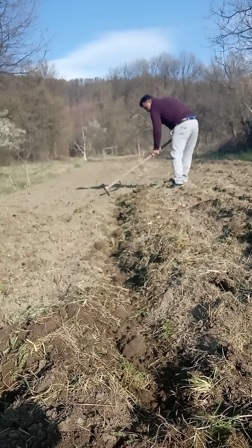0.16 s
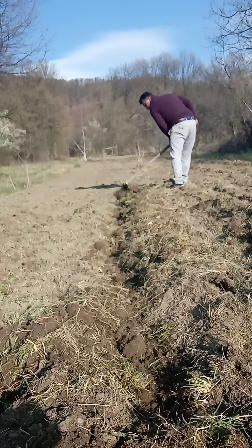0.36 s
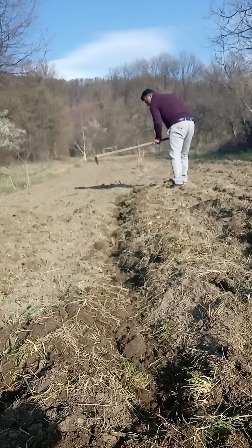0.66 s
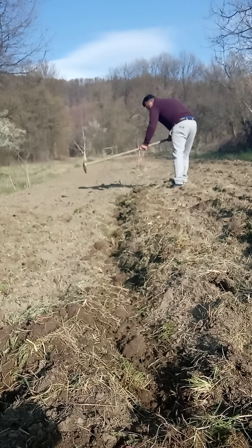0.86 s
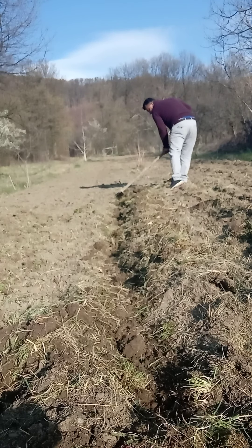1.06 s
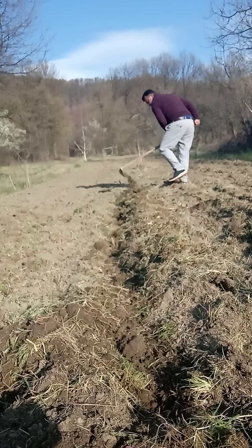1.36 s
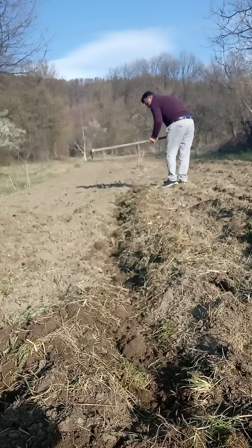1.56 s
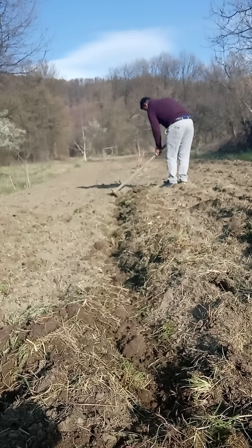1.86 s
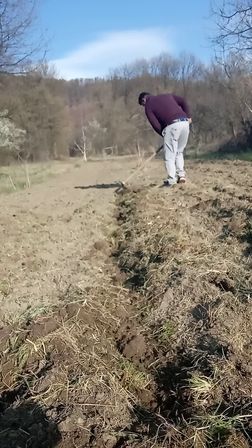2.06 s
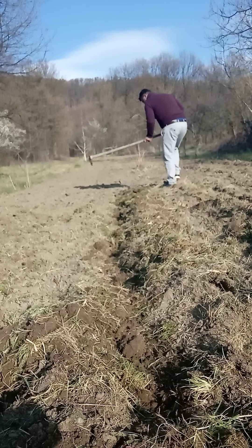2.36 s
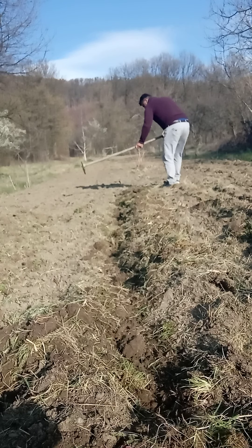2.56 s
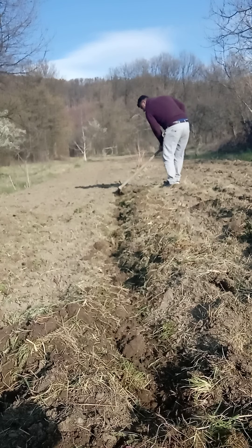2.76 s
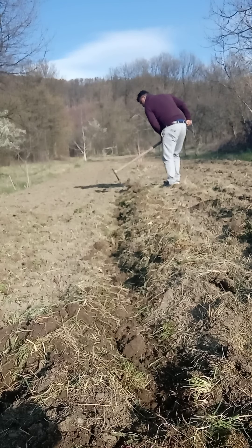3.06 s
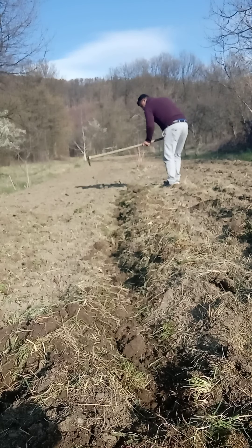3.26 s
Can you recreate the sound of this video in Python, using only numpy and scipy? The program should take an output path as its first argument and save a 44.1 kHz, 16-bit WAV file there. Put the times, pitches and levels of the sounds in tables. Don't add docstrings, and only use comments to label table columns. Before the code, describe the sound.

Low electric phone-vibration buzz pulses on and off outdoors, with small sharp hoe clicks between.

```python
import sys
import numpy as np
from scipy import signal
from scipy.fft import rfft, irfft
from scipy.io import wavfile
from scipy.ndimage import uniform_filter1d

SR = 44100
rng = np.random.default_rng(int(sys.argv[2]) if len(sys.argv) > 2 else 0)


def decibels_to_gain(level_db):
    exponent = np.asarray(level_db, float) / 20
    return 10 ** exponent


def unload_audio(sound):
    columns = np.transpose(np.atleast_2d(sound))
    steps = np.round(np.clip(columns, -1, 1) * 32767)
    wavfile.write(sys.argv[1], SR, steps.astype(np.int16))


N = 149940

# frequency [Hz], density [dB per Hz].
GRIT = [(1400, -27.5), (2150, 1.5), (2600, -4), (4300, -5), (6700, -3.5), (8000, -9), (12000, -19.5),
        (15500, -32)]
CREEP_SHARE = 0.03
POLES = 3


def level(x, db):
    return x * decibels_to_gain(db) / np.sqrt(np.mean(x ** 2))


def shaped(points):
    hz, db = np.array(points, float).T
    f = np.fft.rfftfreq(N, 1 / SR) + 1
    gain = decibels_to_gain(np.interp(np.log(f), np.log(hz), db, -90, -90))
    return level(irfft(rfft(rng.standard_normal(N)) * gain, N), 0)


def band(x, hz, width_hz):
    return signal.lfilter(*signal.iirpeak(hz, hz / width_hz, SR), x)


def steep(x, hz, width_hz):
    return band(band(x, hz, width_hz), hz, width_hz)


def walk(rate):
    hold = int(SR / rate)
    steps = rng.standard_normal(N)[np.arange(N) // hold]
    return 1.36 * uniform_filter1d(uniform_filter1d(steps, hold), hold)


def fade(t, start, t60, attack):
    age = np.clip(t - start, 0, None)
    return (1 - np.exp(-age / attack)) ** 2 * decibels_to_gain(-60 * age / t60)


def field():
    # frequency [Hz], density [dB per Hz].
    wash_colour = [(250, -19.5), (420, -11), (650, -6), (1050, 1.5), (1650, -3.5), (2500, -26.5),
                   (6000, -35), (15800, -51)]
    swell_db, flicker_db = 0.5, 5
    wash, swell = shaped(wash_colour), walk(2.795)
    out = 0
    for hz in 230 * 2 ** np.arange(0, 6.2, 0.5):
        gain = decibels_to_gain(swell_db * swell + flicker_db * walk(6.7))
        out = out + gain * band(wash, hz, hz / 2.8)
    return level(out, -67.5)


def wind(t):
    # frequency [Hz], density [dB per Hz].
    wind_colour = [(22, -37.5), (45, -18.5), (63, 2), (85, -8), (125, -9.5), (200, -19), (300, -30.5)]
    # time [s], level [dB].
    gusts = [(0, -72), (.3, -67.5), (1.2, -62), (1.5, -68), (2.1, -68.5), (2.3, -63), (2.9, -59.5),
             (3.4, -63.5)]
    gust_db = np.interp(t, *np.array(gusts).T)
    return shaped(wind_colour) * decibels_to_gain(gust_db + walk(14))


def rotor(t):
    # power on [s], power off [s], full speed [Hz].
    bursts = [
        (0.1331, 1.127, 187.6),
        (2.136, 3.132, 187.8),
    ]
    spin_up_s, creep_s = 0.052, 0.2
    brake_s, coast_s, coast_share = 0.042, 0.22, 0.45
    arc_off_s = 0.0078
    rush_s, rush_width_s = 0.1, 0.05
    hz, share, current, rush = np.zeros((4, N))
    for on, off, full in bursts:
        age = np.clip(t - on, 0, None)
        coast = np.clip(t - off, 0, None)
        up = 1 - (1 - CREEP_SHARE) * np.exp(-age / spin_up_s) - CREEP_SHARE * np.exp(-age / creep_s)
        drag = coast_share * np.clip(1 - coast / coast_s, 0, 1)
        brake = (1 - coast_share) * np.exp(-(coast / brake_s) ** 2)
        part = up * (drag + brake)
        hz = hz + full * part
        share = share + part
        current = current + (age > 0) * np.exp(-coast / arc_off_s)
        rush = rush + np.exp(-((t - on - rush_s) / rush_width_s) ** 2)
    wander = 1 + 0.001246 * walk(14)
    return hz * wander, share, current, rush


def weight_hum(hz, turn):
    # speed [Hz], gain [dB].
    shake = [(40, -51), (100, -26), (125, -18), (158, -8), (168, -2), (187, 1)]
    flutter_db, rough_db = -1.25, 0.5
    shake_db = np.interp(hz, *np.array(shake).T)
    shake_db = shake_db + flutter_db * walk(27) + rough_db * walk(260)
    return decibels_to_gain(shake_db) * np.sin(turn) * (hz > 0)


def overtones(turn, share, current):
    # multiple of the shaft speed, level [dB re hum].
    orders = [(1, 0), (2, -41), (3, -36), (4, -38), (5, -23), (6, -33), (7, -34), (8, -21), (9, -29),
              (10, -50), (11, -35), (12, -40), (13, -33), (14, -43), (15, -38), (16, -55), (17, -31),
              (18, -44), (19, -40), (20, -33), (21, -40), (22, -39), (23, -38), (24, -35), (25, -40),
              (26, -32), (27, -37), (28, -38), (29, -41), (30, -35), (31, -46), (32, -32), (33, -52),
              (34, -47), (35, -42), (36, -47), (37, -46), (38, -48), (39, -56), (40, -53), (41, -45),
              (42, -59), (43, -57), (44, -55), (45, -65), (46, -63), (47, -65), (48, -56), (49, -61),
              (50, -68), (51, -66), (52, -61), (53, -60), (54, -73), (55, -62), (56, -59), (57, -62),
              (58, -62)]
    high_orders = [-72, -61, -69, -70, -76, -61, -71, -62, -70, -68, -75, -74, -72, -75, -72, -76, -74, -70,
                   -72, -69, -76, -68, -70, -70, -65]
    low_trim = [-4, -1, -6, -1, -5, -2]
    # frequency [Hz], width [Hz], level [dB].
    case = [(2164.6, 119, 12), (1568, 115, -5)]
    order_db = np.r_[np.array(orders)[1:, 1], high_orders] + 1
    order_db[:len(low_trim)] += low_trim
    flutter = [decibels_to_gain(1.1 * walk(24.856)) for _ in range(5)]
    phase = 2 * np.pi * 0.45 * rng.random(len(order_db))
    tones = 0
    for k, db in enumerate(order_db):
        tones = tones + decibels_to_gain(db) * flutter[k % len(flutter)] * np.sin((k + 2) * turn + phase[k])
    tones = tones * share ** 2.86 * current
    return tones + sum(decibels_to_gain(db) * steep(tones, hz, width_hz) for hz, width_hz, db in case)


def running_hiss(turn, share, current):
    # frequency [Hz], density [dB per Hz].
    hiss_colour = [(1800, -12), (2700, -7), (3500, -5), (4600, 0), (6900, -6), (8000, -16), (13500, -31),
                   (15700, -26)]
    gate = 1 + 0.22 * np.cos(POLES * turn)
    return current * decibels_to_gain(-71.5) * share * gate * shaped(hiss_colour)


def brush_scrape(turn, share, current, rush):
    start_db, coast_db, dull_hz = -60, -64, 4620
    start = current * decibels_to_gain(start_db) * np.clip(1 - share - CREEP_SHARE, 0, 1)
    coast = (1 - current) * decibels_to_gain(coast_db) * share ** 0.82
    bright = shaped(GRIT)
    dull = level(steep(bright, dull_hz, dull_hz), 0)
    grit = share * bright + (1 - share) * dull
    rough = decibels_to_gain(1.5 * walk(150) + 11 * rush)
    gate = 1 + 0.36 * np.cos(POLES * turn)
    return (start + coast) * rough * gate * grit


def case_rattle(share, rush):
    # frequency [Hz], density [dB per Hz].
    rattle_colour = [(300, -28), (600, -3.5), (1000, 0.5), (1600, -1.5), (2300, -15), (3200, -21.5)]
    return decibels_to_gain(-66.5) * shaped(rattle_colour) * share * decibels_to_gain(7 * rush)


def motor_ticks(t):
    # start [s], peak [dB].
    tick_times = [(.1342, -46), (.141, -49), (.150, -56), (.159, -57), (.1945, -53), (.229, -52),
                  (1.2595, -54), (2.1345, -44), (2.141, -55), (2.155, -54), (2.1955, -54), (2.23, -55)]
    # frequency [Hz], density [dB per Hz].
    tick_colour = [(2200, -30), (3500, -3), (5000, 0), (7000, 0), (10500, -12), (13000, -30), (15500, -26)]
    t60_s, attack_s = 0.006, 0.0001
    return sum(decibels_to_gain(db - 1) * fade(t, start, t60_s, attack_s) * shaped(tick_colour)
               for start, db in tick_times)


def motor(t):
    hz, share, current, rush = rotor(t)
    turn = 2 * np.pi * np.cumsum(hz) / SR
    tonal = np.sqrt(2) * decibels_to_gain(-39) * (weight_hum(hz, turn) + overtones(turn, share, current))
    brushes = running_hiss(turn, share, current) + brush_scrape(turn, share, current, rush)
    return tonal + brushes + case_rattle(share, rush) + motor_ticks(t)


def hoe(t):
    # start [s], level [dB], decay t60 [s], ring [Hz], ring level [dB].
    blows = [
        (1.019, -55, 0.039, 3000, -0.5),
        (1.8936, -54.5, 0.06, 1670, 2.5),
        (1.903, -71.5, 0.071, 2200, 18),
        (1.911, -51, 0.024, 2560, 0),
        (1.917, -67, 0.023, 1800, 22.5),
        (2.035, -82, .03, 2670, 11),
        (2.714, -55.5, 0.023, 5000, 11),
        (2.7212, -46.5, 0.039, 2660, 4),
    ]
    # frequency [Hz], density [dB per Hz].
    crunch_colour = [(1200, -11), (2000, -3), (6000, -4), (9000, -10.5), (13500, -24), (15500, -6),
                     (15900, -40)]
    ring_width_hz, attack_s = 820, 0.0014
    soil_db, soil_t60_s = -20, 0.25
    crunch = shaped(crunch_colour)
    soil = shaped(GRIT) * decibels_to_gain(1.2 * walk(120))
    out = 0
    for start, db, t60, ring_hz, ring_db in blows:
        ring = level(steep(rng.standard_normal(N), ring_hz, ring_width_hz), ring_db)
        blow = fade(t, start, t60, attack_s) * (crunch + ring)
        crumble = decibels_to_gain(soil_db) * fade(t, start, soil_t60_s, attack_s) * soil
        out = out + decibels_to_gain(db) * (blow + crumble)
    return out


def scene():
    t = np.arange(N) / SR
    return (field() + wind(t) + motor(t) + hoe(t))[None]


def low_pass(x):
    return signal.sosfilt(signal.butter(12, 16690, fs=SR, output="sos"), x)


def record(dry):
    return low_pass(dry)


dry = scene()
out = record(dry)
unload_audio(out)
```